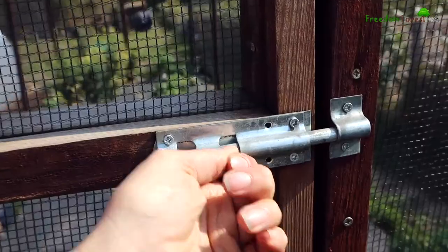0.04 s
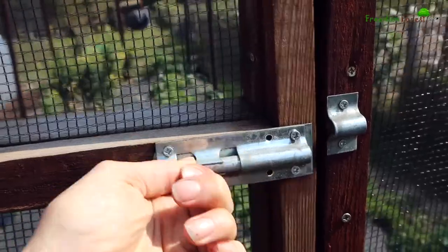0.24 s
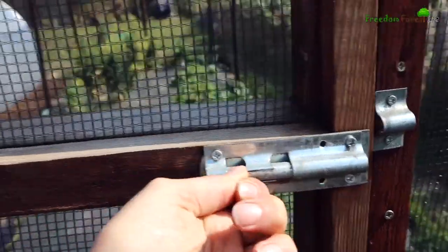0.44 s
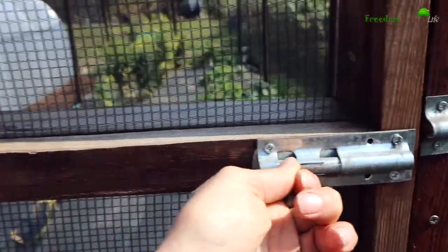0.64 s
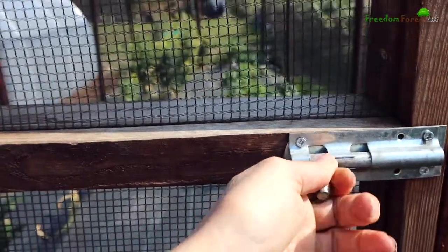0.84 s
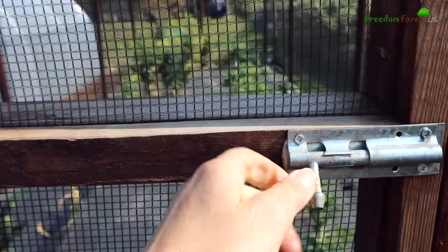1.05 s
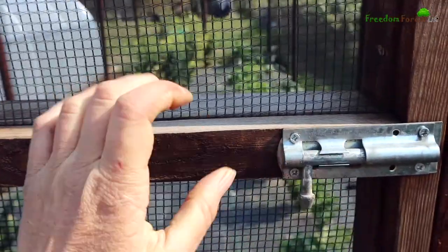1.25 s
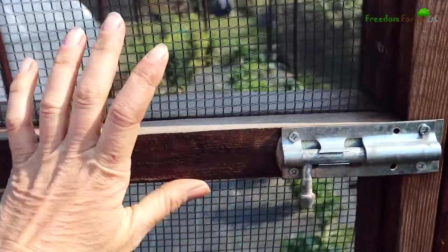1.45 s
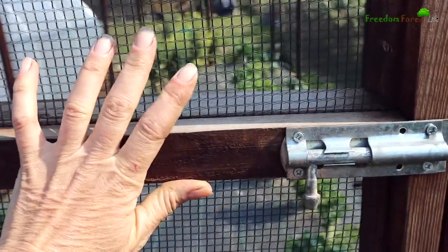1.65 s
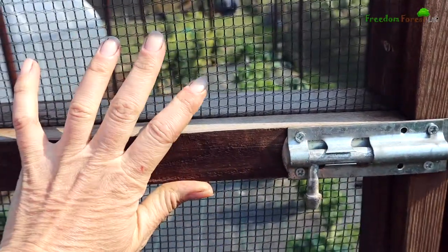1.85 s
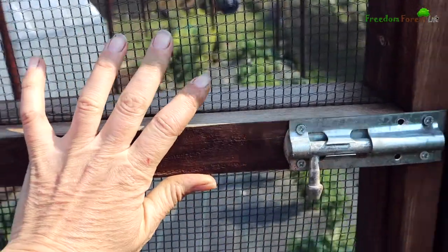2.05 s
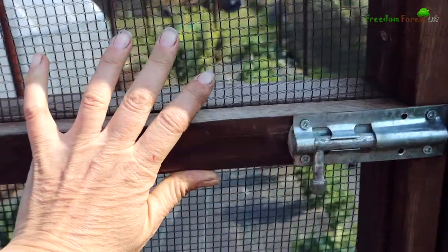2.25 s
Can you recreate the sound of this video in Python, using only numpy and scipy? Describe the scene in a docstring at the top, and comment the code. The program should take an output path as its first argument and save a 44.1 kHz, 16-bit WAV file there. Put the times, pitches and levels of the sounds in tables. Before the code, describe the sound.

Close outdoor sound of a metal door bolt snapping open after a brief hand rustle, then soft knocks of its handle, gliding bird whistles echoing around, distant chirps, and more faint rustling at the end.

```python
"""From the start hand and sleeve rustle (noise grains in bands) over outdoor air (coloured noise).
At 0.1 s a steel bolt on a wooden mesh door squeaks (sine), scrapes (dense clicks) and clacks (ringing modes).
Then a low thump; a bird on the right whistles gliding sines at 0.2 s and 1.0 s, echoing round the yard.
The handle knocks lightly from 0.3 to 1.3 s and small far birds chirp (short swept sines) from 0.5 s.
The rustle returns at the end, with separate creases and two more far slides."""
import sys
import numpy as np
from scipy import signal
from scipy.fft import rfft, irfft, next_fast_len
from scipy.io import wavfile
from scipy.ndimage import uniform_filter1d

SR = 44100
rng = np.random.default_rng(int(sys.argv[2]) if len(sys.argv) > 2 else 0)


def bounce(signal):
    """Save signal as a 16-bit WAV file at the path given by the first command-line argument."""
    frames = np.transpose(np.atleast_2d(signal))
    limited = np.clip(frames, -1, 1)
    pcm = np.round(limited * 32767).astype(np.int16)
    wavfile.write(sys.argv[1], SR, pcm)


N = 101429

# Bolt blows, then handle knocks. Each row: start in seconds, relative level in dB, left-right pan in dB,
# mode tilt in dB per octave, crack and thud relative to the modes in dB, contact rise in ms.
BOLT_BLOWS = [(0.106, -12, -2.5, 4.5, -15.5, -9.5, 0.84), (0.116, 1, -2.5, 5, -12.5, -16, 0.3),
              (0.123, -31, -12, 0, -5, -15, 0.4), (0.125, -21.5, 1, -7, -9, -14, 0.4),
              (0.132, -11, 5.5, -2.5, -14, -4, 0.55), (0.14, -13, 5, 0, -18, -6, 0.46),
              (0.14, -11.5, 3, -1, -17.5, -5.5, 0.38), (0.143, -31, -6, 3, -15.5, -25, 0.4),
              (0.152, -16.5, -22, 0, -12.5, -16.5, 0.86), (0.156, -15, -4.5, 5, -13, -15, 0.45),
              (0.159, 1, 1.5, -1, -7, -11, 0.31), (0.164, -2, 4.5, 2, -13.5, -15, 0.45),
              (0.17, -15.5, 4.5, -7.5, -10, -17, 0.27), (0.17, -21, -0.5, 5, -12, -4.5, 0.4)]
HANDLE_KNOCKS = [(0.299, -30.5, 1, 7.5, -19.5, -12, 0.28), (0.464, -43, -8, 2.5, -24, -9, 0.45),
                 (0.716, -31.5, -0.5, -5.1, -34, -5, 0.48), (0.721, -47, 14, -9, -27, -6.5, 0.61),
                 (0.907, -17.5, 1.5, -1.3, -19.5, -3.5, 0.41), (0.914, -24.5, 1.0, 4.5, -26, -14.5, 0.49),
                 (0.921, -39.5, 0.5, 5, -22, 2, 0.45), (0.95, -30.5, -2.5, -7.5, -26, -6, 0.36),
                 (0.957, -36, -1, -7, -26, -5.5, 0.37), (0.964, -39, 6.5, -4, -25, -1.5, 0.53),
                 (1.005, -41, 5, -3.5, -18, -11, 0.57), (1.283, -35, -9, 4, -14, 1, 0.48),
                 (1.286, -26, -2.5, 0.8, -24, -18, 0.65), (1.292, -25, 4, -2.4, -22, -6, 0.65)]
# Vibration modes. Each row: frequency in Hz, relative level in dB, t60 in seconds.
DOOR_MODES = [(170, -31.5, 0.25), (249, -27, 0.45), (330.6, -9, 0.16), (429, -9, 0.13), (558, -20.5, 0.033),
              (602, -14, 0.066), (782, -13, 0.028), (903, -3.5, 0.035), (1197, 2, 0.054),
              (1342, 1.5, 0.097), (1410, -8.5, 0.045), (1595, 7.5, 0.03), (1736, 0, .04), (2182, 2, 0.018),
              (2466, -7.5, 0.054), (3210, -13.5, 0.031), (4000, -29, 0.036), (4450, -42, 0.019)]
HANDLE_MODES = [(155.5, -18, 0.12), (369.3, -7.5, .1), (465, -11.5, 0.09), (611, -9.5, 0.14),
                (772, -20.5, 0.1), (969, 1.5, 0.086), (1150, -2.5, .05), (1334, -15, 0.14),
                (1477, 6.5, 0.028), (1666, -17, 0.045), (2170, -11, 0.017), (2590, -9.5, 0.052)]
MODE_SCATTER_DB, MODE_START_RAD = 2.5, .6  # standard deviations from blow to blow
MODE_SPREAD_RAD_PER_KHZ = .25  # left-right phase, standard deviation
# Spectra of the crack and of the many faint wood modes. Each row: frequency in Hz, gain in dB.
CRACK_COLOUR = [(1180, -36.5), (2000, -3), (2120, -8), (2950, -0.5), (3610, -2), (4650, -8.5),
                (5880, -30.5), (6460, -17), (8460, -21.5), (15000, -55)]
THUD_COLOUR = [(59, -37.5), (100, -14), (937, 0.5), (1110, -11), (1360, 2), (2030, -17), (2640, -16.5),
               (4000, -49), (5200, -77), (8800, -120)]
CRACK_DECAY_S, THUD_T60_S = .0014, .06  # crack: time constant

SQUEAK_S, SQUEAK_LEN_S, SQUEAK_HZ, SQUEAK_DB, SQUEAK_PAN_DB = .1075, .0071, 3300, -23, -7.5
# Bolt grinding in its barrel. Each row: time in seconds, relative level in dB.
SCRAPE_LEVEL = [(0.102, -67.5), (0.106, -51.5), (0.116, -38), (0.128, -51.5), (0.138, -36), (0.144, -39.5),
                (0.162, -49.5), (0.18, -66), (0.2, -67)]
# Scrape heard through the air. Each row: frequency in Hz, gain in dB.
SCRAPE_COLOUR = [(1180, -36.5), (2000, 1), (2570, 0), (3770, -14), (5200, -12.5), (8130, -34), (13000, -55)]
SCRAPE_BODY_DB = 3.5  # relative share through the door

THUMP_S, THUMP_HZ, THUMP_DB, THUMP_T60_S = .185, 100, -35.5, .28
# Door balance at the two ports. Each row: frequency in Hz, left-right level in dB.
DOOR_BALANCE = [(60, 0.5), (110, 0.0), (200, 1.0), (380, 1.0), (700, 2.0), (1290, -2.0), (2380, -1.5),
                (4400, -3.0), (8120, -1.0), (15000, 1.0)]
# Door phase at the two ports. Each row: frequency in Hz, left-right phase in radians.
DOOR_PHASE = [(0, 0), (1120, 0.2), (2330, -0.0), (2670, 2.1), (4310, -5.3), (5680, -4.0), (6030, -4.5),
              (8100, -11.3), (8790, -11.6), (9650, -10.3), (10400, -13.5), (11900, -12.0), (12500, -18.8),
              (15300, -18.7)]

# Whistle notes, one list per note. Each row: time in seconds, pitch in Hz, relative level in dB.
WHISTLES = [
    [(0.2, 2290, -61.5), (0.206, 2210, -47), (0.214, 2070, -51.5), (0.228, 2030, -46.5), (0.244, 1805, -47),
     (0.262, 1663, -49), (0.298, 1561, -53.5), (0.304, 1592, -47), (0.334, 1752, -47), (0.388, 1962, -44.5),
     (0.42, 1984, -41.5), (0.44, 1857, -46.5), (0.468, 1827, -46.5), (0.5, 1700, -47.5)],
    [(1.02, 2287, -53), (1.026, 2225, -43), (1.034, 2275, -59.5), (1.042, 2184, -44), (1.088, 1719, -39.5),
     (1.1, 1620, -52), (1.11, 1632, -43.5), (1.118, 1600, -43.5), (1.142, 1620, -46.5), (1.178, 1799, -39),
     (1.2, 1969, -44.5), (1.232, 2006, -39), (1.254, 1944, -43), (1.304, 1760, -40), (1.318, 1741, -40),
     (1.345, 1668, -51.5)],
]
WHISTLE_PAN_DB, NEAR_ECHO_DB, NEAR_T60_S = -8, -8, .4
YARD_ECHO_DB, YARD_T60_S = -7.5, 4.7
PORT_LAG_SAMPLES = 4  # left port later than right

# Far two-part chirps. Each row: start in seconds, rise level in dB, fall level in dB.
CHIRPS = [(.51, -74.5, -63), (.67, -63, -64), (0.804, -63, -63), (0.942, -61.5, -51.5), (1.197, -66, -56),
          (1.33, -67, -65), (1.459, -68, -66)]
# Chirp parts. Each row: delay in seconds, length in seconds, start in Hz, end in Hz.
CHIRP_RISE = (0.0, .035, 2750, 3300)
CHIRP_FALL = (0.052, 0.035, 2500, 2400)
# Other far slides. Each row: start in seconds, length in seconds, start in Hz, end in Hz, level in dB.
FAR_SLIDES = [(0.447, .085, 4670, 3260, -78), (1.432, .05, 2300, 2480, -58.5),
              (2.202, 0.0292, 4070, 2970, -56.5), (2.219, 0.026, 3900, 3100, -58.5)]
CHIRP_ECHO_DB = -2

# Hand and sleeve, one list per movement. Each row: time in seconds, level in dB in each of the four bands.
RUSTLE = [
    [(0.0, -57, -57, -83, -60), (0.012, -49, -51, -70, -80), (0.028, -51.5, -53.5, -77, -54),
     (0.058, -43, -41, -54, -60), (0.07, -41, -39, -36, -62), (0.092, -45, -49, -48, -60),
     (0.098, -45, -56, -47, -52)],
    [(0.22, -43, -58, -66, -67), (0.24, -54.5, -45, -47.5, -71), (0.286, -50, -50.5, -56.5, -65),
     (0.304, -47.5, -40.5, -58, -73), (0.318, -51, -48.5, -43, -63), (0.37, -55.5, -47.5, -62, -68),
     (0.406, -62, -71.5, -75.5, -85), (0.44, -65.5, -72, -61.5, -76)],
    [(0.98, -53.5, -51, -64.5, -77), (0.998, -54, -51, -64.5, -67), (1.008, -44.5, -54.5, -55, -71),
     (1.032, -52.5, -49, -53, -68), (1.088, -51, -50.5, -69, -58), (1.134, -53, -48.5, -69, -68),
     (1.188, -69, -71, -90, -93.5), (1.2, -60, -66, -80, -80)],
    [(1.68, -59.5, -69, -83, -89), (1.728, -57, -57.5, -71, -63), (1.95, -49.5, -45.5, -65, -53),
     (2.154, -44, -40.5, -71, -50.5), (2.174, -47.5, -55, -60, -72), (2.218, -58.5, -54.5, -49, -59),
     (2.254, -55, -68, -75, -70), (2.29, -55, -71, -62, -77)],
]
# Rustle bands. Each row: low edge in Hz, high edge in Hz.
RUSTLE_BANDS = [(150, 1100), (1100, 1700), (1700, 3000), (3000, 9000)]
# Rustle spectrum. Each row: frequency in Hz, gain in dB.
RUSTLE_COLOUR = [(88, -38), (150, -8), (330, -4), (378, -11), (489, -6), (643, -12), (1060, -3), (2030, -4),
                 (7710, -47), (9000, -71), (11700, -101), (19800, -120)]
RUSTLE_GRAINS_PER_S, RUSTLE_GRAIN_SPREAD_DB = 3500, 2.2
RUSTLE_SMOOTH_S, RUSTLE_FADE_S = .02, .06
RUSTLE_PAN_DB, RUSTLE_ECHO_DB = -4, -7
# Separate creases. Each row: start in seconds, relative level in dB, time scale in seconds.
CREASES = [(0.3295, -23.5, 0.0043), (0.363, -31, 0.0069), (1.8293, -31.5, 0.005), (1.915, -25.5, 0.0051),
           (1.972, -26.5, 0.0054), (2.0404, -24, 0.0078), (2.184, -29, 0.0058), (2.2097, -31, 0.0063)]
# Handle turning in its slot. Each row: time in seconds, gain in dB.
TURN_LEVEL = [(.84, -100), (.9, -77), (1.0, -73), (1.1, -66.5), (1.15, -83), (1.19, -100)]
# Turn hiss bands. Each row: centre in Hz, width in Hz, relative level in dB.
TURN_BANDS = [(4600, 1900, 3.1), (6790, 400, -8)]
TICK_S, TICK_HZ, TICK_DB = .642, 4460, -56

# Outdoor noise spectrum. Each row: frequency in Hz, gain in dB.
AIR_COLOUR = [(12, -43.5), (20, -7), (65, -3), (90, -18), (129, -9), (155, -32), (190, -9), (216, -20.5),
              (369, -20.5), (408, -23.5), (1020, -28), (1800, -21.5), (2210, -27.5), (4400, -45),
              (9000, -65.5), (11700, -103), (19800, -120)]
AIR_DB, AIR_WIDE_HZ = -54.5, 3970  # left and right differ mostly above AIR_WIDE_HZ
TOP_HZ = 15700


def amp(db):
    """Amplitude from dB."""
    return 10 ** (np.asarray(db) / 20)


def unit(x):
    """Scale to RMS 1."""
    return x / np.sqrt(np.mean(x ** 2))


def decay(t, t60):
    """Exponential fall of 60 dB in t60 seconds."""
    return np.exp(-np.log(1000) * t / t60)


def curve(rows, col=1):
    """Interpolate one table column over time."""
    rows = np.array(rows)
    return np.interp(np.arange(N) / SR, rows[:, 0], rows[:, col])


def colour(x, points):
    """Filter by (Hz, dB) points, interpolated over log frequency."""
    points, n = np.array(points), next_fast_len(N, True)
    hz = np.maximum(np.arange(n // 2 + 1) * SR / n, 1)
    gain_db = np.interp(np.log(hz), np.log(points[:, 0]), points[:, 1])
    return irfft(rfft(x, n) * amp(gain_db), n)[:N]


def bandpass(x, low_hz, high_hz):
    """Butterworth band-pass."""
    return signal.sosfilt(signal.butter(2, [low_hz, high_hz], "band", fs=SR, output="sos"), x)


def place(x, pan_db, lag_samples=0):
    """Pan by left-right dB; the left is late by lag_samples (early if negative)."""
    return np.array([np.roll(x, lag_samples) * amp(pan_db / 2), x * amp(-pan_db / 2)])


def echo(x, t60):
    """Diffuse outdoor echo: convolution with decaying noise, its own for each side."""
    tail = rng.standard_normal((2, N)) * decay(np.arange(N) / SR, t60)
    tail /= np.sqrt(np.sum(tail ** 2, axis=1, keepdims=True))
    return signal.fftconvolve(tail, x[None], axes=1)[:, :N]


def grains(per_s, spread_db):
    """Randomly scattered clicks of uneven size."""
    hits = rng.random(N) < per_s / SR
    return hits * rng.standard_normal(N) * amp(spread_db * rng.exponential(size=N))


def blows(table, modes):
    """Each blow rings the modes through a soft contact, with a wooden thud and a short crack."""
    out, t = np.zeros((2, N)), np.arange(SR // 4) / SR
    hz, db, t60 = (c[:, None] for c in np.array(modes).T)
    mid, side, wood = (unit(colour(rng.standard_normal(N), c))
                       for c in (CRACK_COLOUR, CRACK_COLOUR, THUD_COLOUR))
    crack_noise = mid + 0.52 * side * np.array([[1], [-1]])
    for s, level_db, pan_db, tilt, crack_db, thud_db, contact_ms in table:
        chance = rng.standard_normal((3, len(modes), 1))
        mode_db = db + tilt * np.log2(hz / 1000) + MODE_SCATTER_DB * chance[0]
        size = amp(mode_db) * decay(t, t60)
        side_phase = MODE_SPREAD_RAD_PER_KHZ * hz / 1000 * chance[1]
        phase = 2 * np.pi * hz * t + MODE_START_RAD * chance[2]
        ring = np.array([(size * np.sin(phase + k * side_phase)).sum(0) for k in (0, 1)])
        ring /= np.sqrt(np.sum(size[:, 0] ** 2))
        i = int(s * SR)
        span = slice(i, i + len(t))
        thud = amp(thud_db) * wood[span] * decay(t, THUD_T60_S)
        crack = amp(crack_db) * crack_noise[:, span] * np.exp(-t / CRACK_DECAY_S)
        contact = np.sin(np.pi / 2 * np.clip(t * 1000 / max(contact_ms, .1), 0, 1)) ** 2
        gain = amp(level_db + np.array([[pan_db], [-pan_db]]) / 2)
        out[:, span] += contact * (ring + thud + crack) / 2 * gain
    return out


def slide():
    """The bolt squeaks as it frees and grinds: dense clicks, bright in the air and dull through the door."""
    t = np.arange(N) / SR - SQUEAK_S
    gate = np.clip(np.minimum(t / .0015, (SQUEAK_LEN_S - t) / .0027), 0, 1)
    squeak = amp(SQUEAK_DB) * gate * np.sin(2 * np.pi * SQUEAK_HZ * t)
    level_db = curve([(.09, -120)] + list(SCRAPE_LEVEL) + [(.23, -120)])
    grit = unit(grains(6000, 2.5)) * amp(level_db)
    body = 0
    for hz, db, t60 in DOOR_MODES:
        pole = np.exp(2j * np.pi * hz / SR - np.log(1000) / t60 / SR)
        body = body + amp(db) * signal.lfilter([1], [1, -pole], grit).imag
    bright = amp(21) * colour(grit, SCRAPE_COLOUR)
    dull = amp(SCRAPE_BODY_DB) * body / 20
    return place(squeak, SQUEAK_PAN_DB) + place(bright, -.3) + place(dull, .3)


def ports(x):
    """Each band of the door sound reaches the two microphone ports at its own level and phase."""
    n = next_fast_len(N, True)
    hz = np.arange(n // 2 + 1) * SR / n
    db, phase = (np.interp(hz, *np.array(p).T) for p in (DOOR_BALANCE, DOOR_PHASE))
    half = amp(db / 2) * np.exp(.5j * phase)
    return irfft(rfft(x, n) * np.array([half, 1 / half]), n)[:, :N]


def thump():
    """The door shakes free: a low sine swells quickly and decays."""
    t = np.maximum(np.arange(N) / SR - THUMP_S, 0)
    swell = (1 - np.exp(-t / .0123)) * decay(t, THUMP_T60_S)
    return amp(THUMP_DB) * swell * np.sin(2 * np.pi * THUMP_HZ * t)


def whistler():
    """Pure gliding whistles with a near echo and a long ring round the yard."""
    voice = 0
    for rows in WHISTLES:
        first, last = rows[0], rows[-1]
        rows = [(first[0] - .02, first[1], -90)] + list(rows) + [(last[0] + .032, last[1], -90)]
        hz = uniform_filter1d(curve(rows), size=600)
        tone = np.sin(2 * np.pi * np.cumsum(hz) / SR)
        voice = voice + np.sqrt(2) * amp(curve(rows, col=2)) * tone
    # band noise in the first 50 ms, heard only through the yard echo
    earlier = unit(colour(rng.standard_normal(N), [(1450, -51), (1620, -8), (2000, -2.5), (2250, -47)]))
    earlier = amp(-56) * earlier * (np.arange(N) < SR // 20)
    near = amp(NEAR_ECHO_DB) * echo(voice, NEAR_T60_S)
    yard = amp(YARD_ECHO_DB) * echo(voice + earlier, YARD_T60_S)
    return place(voice, WHISTLE_PAN_DB, PORT_LAG_SAMPLES) + near + yard


def hand():
    """Skin and cloth crackle and crease; the handle hisses in its slot; one thin tick."""
    t = np.arange(N) / SR
    grit = colour(grains(RUSTLE_GRAINS_PER_S, RUSTLE_GRAIN_SPREAD_DB), RUSTLE_COLOUR)
    bands = [unit(bandpass(grit, *edges)) for edges in RUSTLE_BANDS]
    rub = 0
    for rows in RUSTLE:
        fade = np.clip(1 + np.minimum(t - rows[0][0], rows[-1][0] - t) / RUSTLE_FADE_S, 0, 1)
        for k, band in enumerate(bands):
            level_db = uniform_filter1d(curve(rows, col=k + 1), int(RUSTLE_SMOOTH_S * SR))
            rub = rub + fade * band * amp(level_db)
    crisp = unit(colour(rng.standard_normal(N), RUSTLE_COLOUR))
    for s, db, scale_s in CREASES:
        u = np.maximum(t - s, 0) / scale_s
        rub = rub + amp(db) * u * np.exp(-u * 2) * crisp
    hiss = 0
    for hz, width_hz, db in TURN_BANDS:
        noise = bandpass(rng.standard_normal((2, N)), hz - width_hz / 2, hz + width_hz / 2)
        hiss = hiss + amp(db) * unit(noise)
    tick = amp(TICK_DB) * np.exp(-((t - TICK_S) / .00047) ** 2) * np.sin(2 * np.pi * TICK_HZ * t)
    rustle = place(rub, RUSTLE_PAN_DB, PORT_LAG_SAMPLES) + amp(RUSTLE_ECHO_DB) * echo(rub, .073)
    return rustle + hiss * amp(curve(TURN_LEVEL)) + place(tick, 0)


def chirps():
    """Far birds: short swept sines, half drowned in echo."""
    voice, t = np.zeros(N), np.arange(N) / SR
    parts = []
    for s, *levels_db in CHIRPS:
        for (delay_s, *sweep), db in zip((CHIRP_RISE, CHIRP_FALL), levels_db):
            parts.append((s + delay_s, *sweep, db))
    for s, length_s, start_hz, end_hz, db in parts + FAR_SLIDES:
        u = np.clip((t - s) / length_s, 0, 1)
        hz = start_hz + (end_hz - start_hz) * u
        voice += amp(db) * np.sin(np.pi * u) * np.sin(2 * np.pi * np.cumsum(hz) / SR)
    return place(voice, -3.2, -PORT_LAG_SAMPLES) + amp(CHIRP_ECHO_DB) * echo(voice, .19)


def air():
    """Distant outdoor noise: a shared middle plus a high-passed side, so the bass is alike left and right."""
    mid, side = (colour(rng.standard_normal(N), AIR_COLOUR) for _ in range(2))
    side = signal.lfilter(*signal.butter(1, AIR_WIDE_HZ, "high", fs=SR), side)
    return amp(AIR_DB) / np.std(mid) * np.array([mid + side, mid - side])


def scene():
    """Door with a short echo of its upper range, then birds, hand and air."""
    door = blows(BOLT_BLOWS, DOOR_MODES) + blows(HANDLE_KNOCKS, HANDLE_MODES) + slide()
    latch = ports(door) + thump()
    upper = signal.lfilter(*signal.butter(2, 800, "high", fs=SR), latch.mean(0))
    return latch + amp(-17.5) * echo(upper, .12) + whistler() + hand() + chirps() + air()


def record(dry):
    """The phone cuts the top: steep elliptic low-pass."""
    return signal.sosfilt(signal.ellip(8, .2, 70, TOP_HZ, fs=SR, output="sos"), dry)


dry = scene()
out = record(dry)
bounce(out)
```